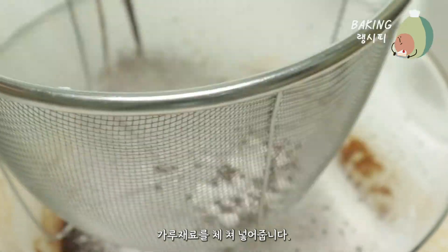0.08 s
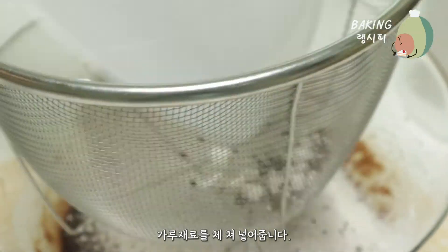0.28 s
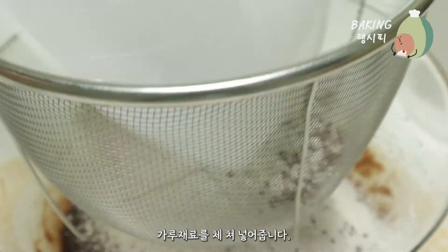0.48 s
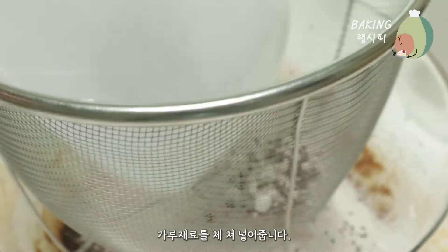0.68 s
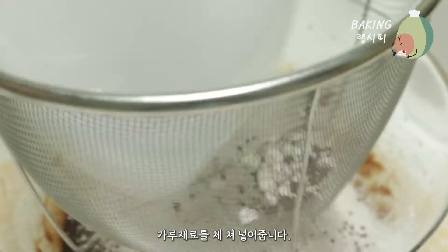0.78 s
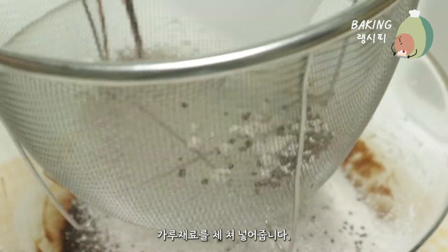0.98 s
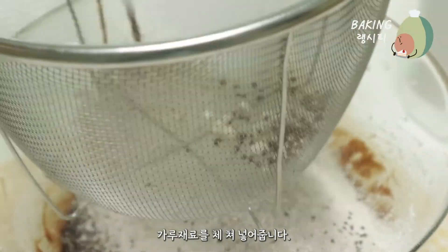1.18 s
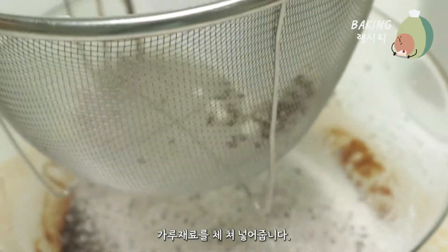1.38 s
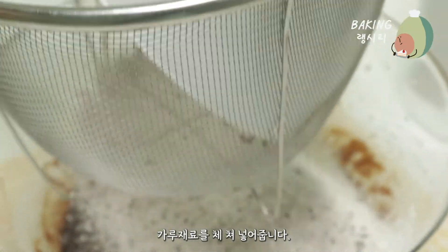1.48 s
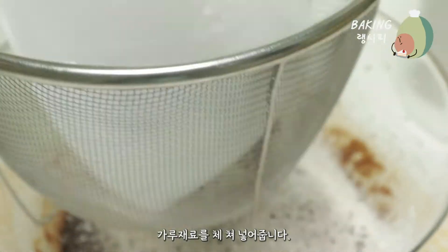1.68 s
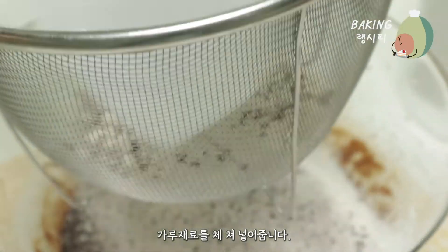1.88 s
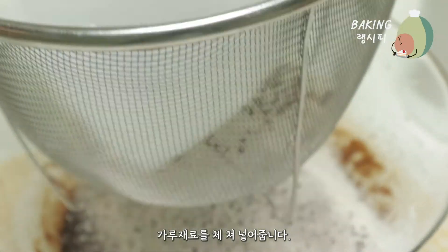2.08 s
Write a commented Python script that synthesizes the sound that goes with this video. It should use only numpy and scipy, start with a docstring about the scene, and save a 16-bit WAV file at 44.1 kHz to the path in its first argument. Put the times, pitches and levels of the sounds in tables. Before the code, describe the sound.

A metal mesh sieve is knocked sharply about five times, two knocks doubled, with short rattly clatter; then it ticks and scrapes briefly against a bowl. Small kitchen, close microphone, low pulsing motor hum underneath.

```python
"""A small kitchen, close by: a wire-mesh sieve is knocked five times over a bowl, two of the knocks doubled.
Each knock is a noise burst of wire collisions in four frequency ranges, with decaying sine tones;
it excites the resonant modes of the frame. The sieve then ticks and scrapes as it is shifted: short bursts
and grains of friction. The bowl and the room add decaying noise responses.
Two low motor tones beat against each other underneath, over faint rumble and hiss."""
import sys
import numpy as np
from scipy import signal
from scipy.fft import rfft, irfft
from scipy.io import wavfile
from scipy.ndimage import uniform_filter1d

SR = 44100
rng = np.random.default_rng(int(sys.argv[2]) if len(sys.argv) > 2 else 0)


def digitize_waveform(pressure):
    """Quantize a signal to 16-bit integers and store it at the path in sys.argv[1].

    Rows of a 2-D input are taken as channels; values are limited to [-1, 1].
    """
    field = np.atleast_2d(pressure).T
    bounded = np.clip(field, -1, 1)
    quanta = np.round(bounded * 32767).astype(np.int16)
    wavfile.write(sys.argv[1], SR, quanta)


N = 92610
T = np.arange(N) / SR

# background spectrum: f/Hz, relative density level/dB
BACKGROUND_SPECTRUM = [(20, 11), (33, 1), (55, -6.5), (120, 13.5), (205, -2.5), (260, -17.5), (500, -18.5),
                       (2000, -27), (12000, -31), (20000, -55.5)]
BACKGROUND_DB, BACKGROUND_SIDE = -67, 0.49   # rms level of the part common to both ears; share of the difference

# upper motor tone: t/s, f/Hz, level/dB
UPPER_MOTOR_TONE = [(0, 122.3, -37.5), (.22, 121.4, -41.5), (.255, 121, -48.5), (.3, 123, -42),
                    (.66, 119.4, -43), (.9, 121.3, -45), (1.35, 121.9, -50), (1.7, 120, -46.5),
                    (2.1, 121.7, -42.5)]
# lower motor tone: t/s, level/dB against the upper one
LOWER_MOTOR_TONE = [(0, -3), (.35, -8), (.55, -7), (.8, -9.5), (1, -3.5), (1.18, -3.5), (1.4, -1.5),
                    (2.1, 2)]
BEAT_HZ, BEAT_NULL_S = 8.17, 1.355   # difference frequency; an instant when the tones oppose

# spectrum of the kitchen reflections: f/Hz, level/dB
ROOM_SPECTRUM = [(200, -0.5), (320, -1.5), (450, -1), (650, -8), (1000, -4.5), (1600, -16), (2400, -11),
                 (3600, -10), (6000, -12.5), (8000, -14.5), (12000, -17)]
# spectrum of the difference between the ears: f/Hz, level/dB added to the room spectrum
ROOM_SIDE_SPECTRUM = [(300, -19.5), (650, -7.5), (1100, 3.5), (2500, 2)]
ROOM_DELAY_S, ROOM_FALL_DB_PER_S, ROOM_BEND_DB_PER_S2, ROOM_SIDE = 0.009, 202, 1695, 0.94
ROOM_LOW_HZ, ROOM_LOW_EXTRA_FALL_DB_PER_S = 474, 130   # the lows die sooner
BOWL_DECAY_S, BOWL_DB, BOWL_ABOVE_HZ = 0.0068, -1.5, 2600   # time constant, level, lower limit

# rustling of the mesh: start t/s, end t/s, rim level/dB, mesh level/dB
RUSTLES = [(.225, .243, -24, -20), (.832, .857, -52, -40), (1.481, 1.503, -80, -51),
           (1.505, 1.55, -72, -48), (2.03, 2.075, -70, -52)]
# pressure of the rim scraping along the bowl: t/s, level/dB
SCRAPE_PRESSURE = [(1.718, -38.5), (1.756, -31.5), (1.77, -22.5), (1.794, -24), (1.81, -34), (1.844, -32.5),
                   (1.863, -62)]
# share of the scrape in each range: one level/dB each for thud, frame, rim, mesh
SCRAPE_RANGE_DB = [0, 13.5, 3, 0]
GRAINS_PER_S, GRAIN_SPREAD_DB = 5000, 2.5
SCRAPE_JERK_DB, SCRAPE_JERK_S = 2.5, 0.004   # greatest unevenness of the slipping; averaging time
SQUEAK_HZ, SQUEAK_DB, SQUEAK_T60_S = 856.5, 16.5, 0.17   # resonance of the bowl

# light touches as the sieve is shifted: t/s, clatter decay/ms, frame level/dB, rim level/dB, mesh level/dB
TOUCHES = [(1.503, 1.52, -35.5, -49, -7.5), (1.55, 7.4, -6.5, -30.5, -11), (1.7007, 7.6, -2.5, -18.5, -17),
           (1.722, 19, 7, 0, -3), (1.7455, 6.4, -7.5, 5, 5), (1.783, 4, 9.5, 0, -6),
           (1.797, 2.61, 3.5, 5, -4), (1.846, 4.2, -12, -19, -17), (2.024, 7, -15, -22, -6),
           (2.0755, 6, -5, -19.5, -10.5), (2.080, 1, -37, -20.5, -22)]
TOUCH_LOWEST_HZ = 534
TOUCH_TONE_HZ, TOUCH_TONE_DB, TOUCH_TONE_T60_S = 1094, -31.5, 0.046   # level against the frame column

# knocks, each spot favouring one brief tone and one ringing mode:
# t/s, clatter decay/ms, lowest f/Hz, tone f/Hz, tone level/dB, ring f/Hz, ring level/dB,
# thud level/dB, frame level/dB, rim level/dB, mesh level/dB
KNOCKS = [(0.2227, 2.5, 380, 1630, -19, 555, -37, 5.5, 17.5, 15.5, 11.5),
          (0.2439, 1.6, 400, 733, -15, 974.5, -28.5, 14, 19.5, 11, 9.5),
          (0.4521, 3.5, 380, 651, -8, 1052, -29, 14, 21.5, 15, 12),
          (0.641, 2.5, 330, 3770, -19, 615, -32, 14, 14.5, 13.5, 7.5),
          (0.6651, 1.2, 380, 636.5, -18.5, 585, -39.5, 7, 6, 3, -2),
          (.8587, 3.07, 220, 985, -12, 1054, -30.5, 18.5, 15, 19, 14.5),
          (1.091, 3.2, 260, 2800, -20, 586.4, -42, 19, 15.5, 17.5, 12)]
KNOCK_TONE_T60_S, KNOCK_RING_T60_S = 0.023, 0.125
CLICK_SHARE, CLATTER_RISE_S, TONE_RISE_S = 0.7, 0.00027, 0.00033
TONE_DECAY_POWER = 1.6   # above 1 the level in dB falls ever faster
TONES_ABOVE_HZ = 330

# ranges of thud, frame, rim and mesh, one row each: low f/Hz, high f/Hz
SOUNDING_RANGES = [(265, 550), (540, 1083), (1330, 2897), (3150, 11500)]
# broad resonances and dips of the sieve: f/Hz, level/dB, Q
SIEVE_RESONANCES = [(658, 2, 3.8), (980, 0.5, 4), (1710, -7, 4.8), (2110, 3.5, 18), (3380, 5, 5),
                    (4070, 3, 15), (5660, -6.5, 3), (6860, 5, 13), (8700, -0.5, 11), (11040, 1, 2.8)]
# ringing modes of the frame: f/Hz, level/dB
FRAME_MODES = [(322, -5), (470, -9), (605, -4.5), (676, 0), (790, -12.5), (965, 4), (1066, 3), (1410, -10),
               (2262, -4), (2900, -15.5), (3456, 1.5), (3790, -6.5), (4478, 2.5)]
FRAME_LOW_LIMIT_T60_S, FRAME_DAMPING_HZ = 0.175, 10000   # towards 0 Hz; frequency where it has halved

LEFT_LEAD_S, PAN_DB = 0.000036, 0.76   # left ear early; up on the left and down on the right
TOP_HZ, CUTOFF_HZ = 11400, 16000


def from_db(db):
    """Logarithmic measure: decibels to amplitude gain."""
    return 10 ** (np.asarray(db) / 20)


def curve(rows):
    """Linear interpolation: the columns of a table joined by straight lines in time."""
    s, *columns = np.transpose(rows)
    return [np.interp(T, s, c) for c in columns]


def coloured(x, points):
    """Spectral shaping: gain interpolated over the logarithm of frequency."""
    size = x.shape[-1]
    hz, db = np.transpose(points)
    f = np.maximum(np.arange(size // 2 + 1) * SR / size, 1)
    gain = from_db(np.interp(np.log(f), np.log(hz), db))
    return irfft(rfft(x) * gain, size)


def above(x, hz):
    """High-pass filtering: the lows are taken away."""
    return signal.sosfilt(signal.butter(4, hz, "high", fs=SR, output="sos"), x + 1e-18)


def resonance(x, hz, t60):
    """Damped oscillator: one mode driven by x, gain 1 at its peak."""
    r = np.exp(-np.log(1000) / (t60 * SR))
    poles = [1, -2 * r * np.cos(2 * np.pi * hz / SR), r * r]
    return (1 - r) * signal.lfilter([1, 0, -1], poles, x)


def background():
    """Stationary random noise: faint rumble and hiss, partly different in each ear."""
    mid, side = coloured(rng.standard_normal((2, N)), BACKGROUND_SPECTRUM)
    return from_db(BACKGROUND_DB) * (mid + BACKGROUND_SIDE * side * [[1], [-1]]) / mid.std()


def motor_hum():
    """Beats: two motor tones a few hertz apart interfere while drifting in pitch."""
    hz, upper_db = curve(UPPER_MOTOR_TONE)
    lower_db, = curve(LOWER_MOTOR_TONE)
    phase = 2 * np.pi * np.cumsum(hz) / SR
    lower_phase = phase - 2 * np.pi * BEAT_HZ * (T - BEAT_NULL_S)
    return from_db(upper_db) * (np.sin(phase) - from_db(lower_db) * np.sin(lower_phase))


def kitchen(x):
    """Convolution: decaying noise with a fall that steepens by design, the lows sooner and nearly alike
    in both ears."""
    t = np.arange(SR // 4) / SR
    envelope = from_db(-ROOM_FALL_DB_PER_S * t - ROOM_BEND_DB_PER_S2 * t * t) * (t > ROOM_DELAY_S)
    mid, side = coloured(rng.standard_normal((2, len(t))), ROOM_SPECTRUM)
    side = ROOM_SIDE * coloured(side, ROOM_SIDE_SPECTRUM)
    ears = np.array([mid + side, mid - side])
    lows = signal.sosfiltfilt(signal.butter(4, ROOM_LOW_HZ, fs=SR, output="sos"), ears)
    faded_lows = lows * from_db(-ROOM_LOW_EXTRA_FALL_DB_PER_S * t)
    response = (ears - lows + faded_lows) * envelope / np.linalg.norm(envelope)
    return signal.fftconvolve(x[None], response, axes=1)[:, :N]


def bowl(x):
    """Early reflection: the bowl returns the treble differently to each ear, which widens it."""
    t = np.arange(SR // 50) / SR
    response = rng.standard_normal((2, len(t))) * np.exp(-t / BOWL_DECAY_S)
    response /= np.linalg.norm(response, axis=1, keepdims=True)
    treble = signal.sosfilt(signal.butter(2, BOWL_ABOVE_HZ, "high", fs=SR, output="sos"), x)
    return from_db(BOWL_DB) * signal.fftconvolve(treble[None], response, axes=1)[:, :N]


def grains():
    """Dry friction: dense tiny slips of random sign and uneven size, rms 1."""
    slip_now = rng.random(N) < GRAINS_PER_S / SR
    sign = rng.choice([-1, 1], N)
    size = from_db(GRAIN_SPREAD_DB * np.minimum(rng.exponential(1, N), 4))
    x = slip_now * sign * size
    return x / x.std()


def rustling_mesh(slips):
    """Friction of wire on wire: slips drive the rim and mesh ranges for short spells."""
    drives = np.zeros((4, N))
    for start, end, rim_db, mesh_db in RUSTLES:
        rustle = slips * (T > start) * (T < end)
        drives += np.outer([0, 0, *from_db([rim_db, mesh_db])], rustle)
    return drives


def scraping_rim(slips):
    """Jerky sliding friction: slips under varying pressure excite a resonance of the bowl, which rings on."""
    s, db = np.transpose(SCRAPE_PRESSURE)
    jerks = uniform_filter1d(rng.standard_normal(N), max(int(SCRAPE_JERK_S * SR), 1))
    level_db = np.interp(T, s, db) + SCRAPE_JERK_DB * np.tanh(jerks / jerks.std())
    scrape = from_db(level_db) * (T > s[0]) * (T < s[-1]) * slips
    drives = np.outer(from_db(SCRAPE_RANGE_DB), scrape)
    drives[1] += from_db(SQUEAK_DB) * resonance(scrape + 1e-18, SQUEAK_HZ, SQUEAK_T60_S)
    return drives


def clatter(s, decay_ms):
    """Impact: a click and a dying burst of wire collisions, together of unit energy."""
    t = np.arange(SR // 20) / SR
    envelope = np.exp(-t * 1e3 / decay_ms) * (1 - np.exp(-t / CLATTER_RISE_S))
    burst = rng.standard_normal(len(t)) * envelope
    burst /= np.linalg.norm(burst)
    burst[int(CLATTER_RISE_S * SR)] += CLICK_SHARE
    for _ in range(2):   # even out the energy over frequency
        flat = irfft(np.exp(1j * np.angle(rfft(burst))), len(t))
        burst = flat * np.sqrt(envelope)
    return np.interp(T - round(s * SR) / SR, t, burst / np.linalg.norm(burst), left=0, right=0)


def tone(s, hz, t60):
    """Decaying vibration: a struck sine whose level in dB falls ever faster."""
    t = np.maximum(T - s, 0)
    rise = 1 - np.exp(-t / TONE_RISE_S)
    fall = np.exp(-np.log(1000) * np.minimum(t / t60, 2) ** TONE_DECAY_POWER)
    return np.sin(2 * np.pi * hz * t) * rise * fall


def touches():
    """Light impacts: clatter without thud, each with the same brief tone."""
    drives = tones = 0
    for s, ms, frame, rim, mesh in TOUCHES:
        gains = [0, *from_db([frame, rim, mesh])]
        drives = drives + np.outer(gains, above(clatter(s, ms), TOUCH_LOWEST_HZ))
        tones = tones + from_db(frame + TOUCH_TONE_DB) * tone(s, TOUCH_TONE_HZ, TOUCH_TONE_T60_S)
    return drives, tones


def knocks():
    """Modal excitation by impact: the spot struck selects a brief tone and a ringing mode."""
    drives = tones = 0
    for s, ms, lowest_hz, tone_hz, tone_db, ring_hz, ring_db, *levels in KNOCKS:
        drives = drives + np.outer(from_db(levels), above(clatter(s, ms), lowest_hz))
        tones = tones + from_db(tone_db) * tone(s, tone_hz, KNOCK_TONE_T60_S)
        tones = tones + from_db(ring_db) * tone(s, ring_hz, KNOCK_RING_T60_S)
    return drives, tones


def in_ranges(drives):
    """Band-pass filtering: four drives confined to the thud, frame, rim and mesh ranges, then summed."""
    total = 0
    for order, edges, drive in zip((3, 3, 3, 7), SOUNDING_RANGES, drives):
        band = signal.butter(order, edges, "band", fs=SR, output="sos")
        total = total + signal.sosfilt(band, drive + 1e-18)
    return total


def sieve(drive):
    """Resonance: broad peaks and dips colour every contact, and the modes of the frame ring on."""
    for hz, db, q in SIEVE_RESONANCES:
        w, g = 2 * np.pi * hz / SR, from_db(db / 2)
        a = np.sin(w) / (2 * q)
        zeros = [1 + a * g, -2 * np.cos(w), 1 - a * g]
        poles = [1 + a / g, -2 * np.cos(w), 1 - a / g]
        drive = signal.lfilter(zeros, poles, drive)
    rings = 0
    for hz, db in FRAME_MODES:
        t60 = FRAME_LOW_LIMIT_T60_S / (1 + hz / FRAME_DAMPING_HZ)   # high modes die sooner
        rings = rings + from_db(db) * resonance(drive, hz, t60)
    return drive, rings


def scene():
    """Superposition and binaural cues: the sieve slightly to the left, in the room, over the hum."""
    slips = grains()
    friction = rustling_mesh(slips) + scraping_rim(slips)
    touch_drives, touch_tones = touches()
    knock_drives, knock_tones = knocks()
    tones = above(touch_tones + knock_tones, TONES_ABOVE_HZ)
    direct, rings = sieve(in_ranges(knock_drives + touch_drives + friction))
    left, right = direct + rings + tones + bowl(direct) + kitchen(direct + 0.5 * tones)
    f = np.arange(N // 2 + 1) * SR / N
    right = irfft(rfft(right) * np.exp(-2j * np.pi * f * LEFT_LEAD_S), N)   # later on the right
    ears = np.array([left * from_db(PAN_DB), right * from_db(-PAN_DB)])
    return ears + motor_hum() + background()


def record(dry):
    """Band limiting and overload: the microphone loses the top octave and clips the hardest peaks."""
    dull = signal.sosfilt(signal.butter(4, TOP_HZ, fs=SR, output="sos"), dry)
    clipped = np.clip(dull, -1, 1)
    return signal.sosfilt(signal.cheby2(12, 50, CUTOFF_HZ, fs=SR, output="sos"), clipped)


dry = scene()
out = record(dry)
digitize_waveform(out)
```